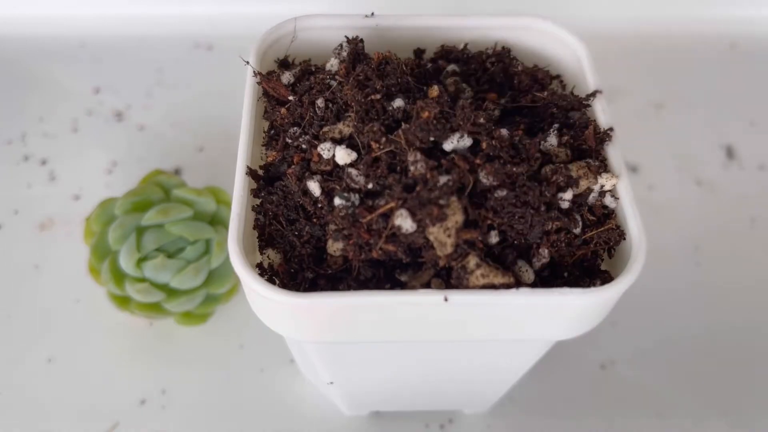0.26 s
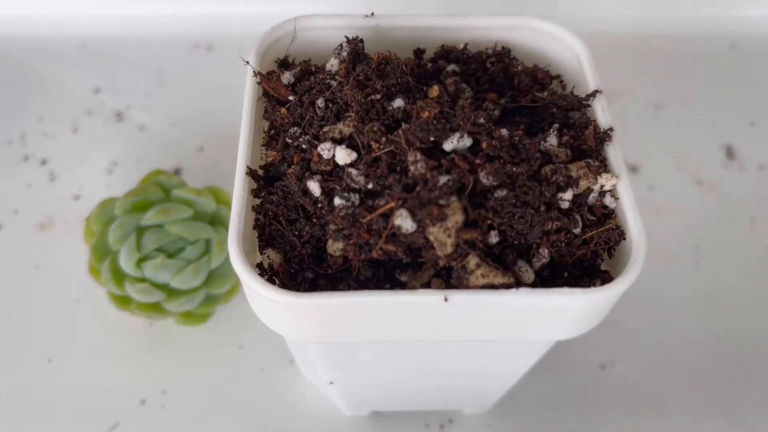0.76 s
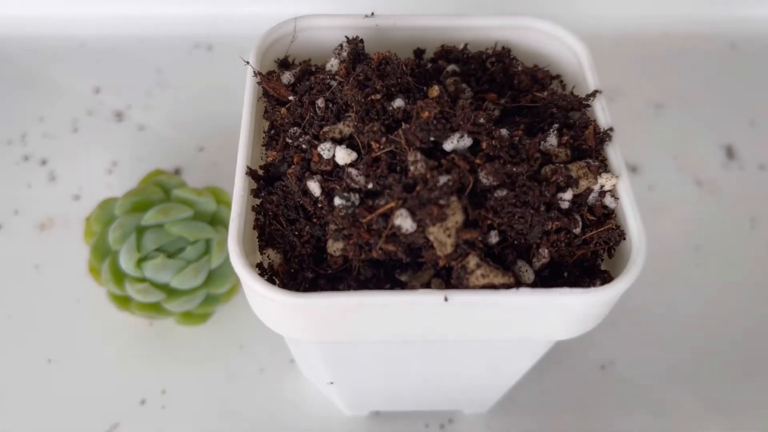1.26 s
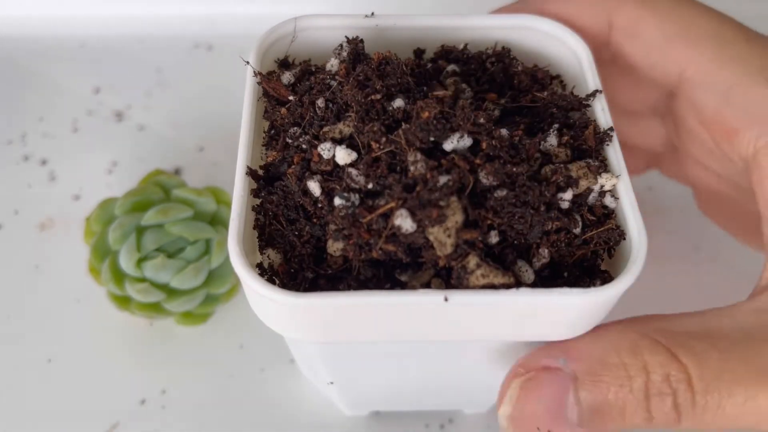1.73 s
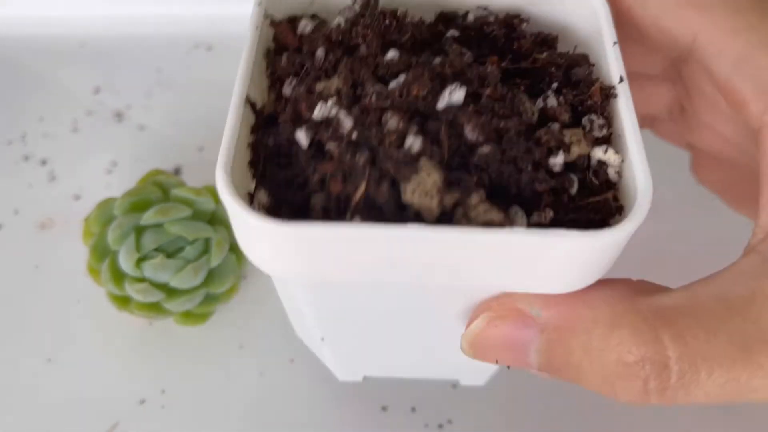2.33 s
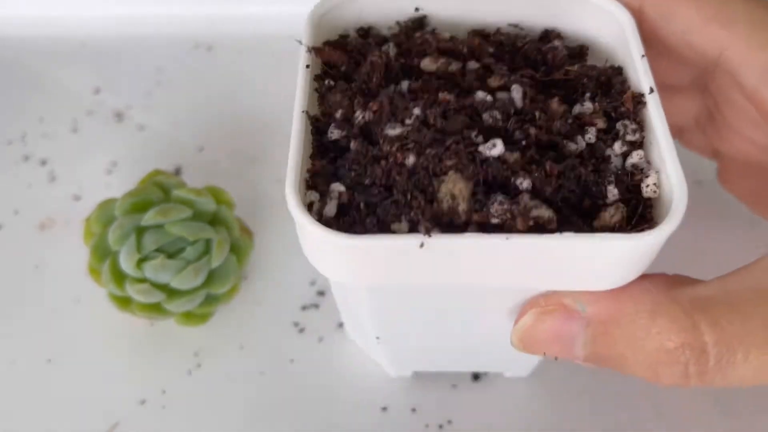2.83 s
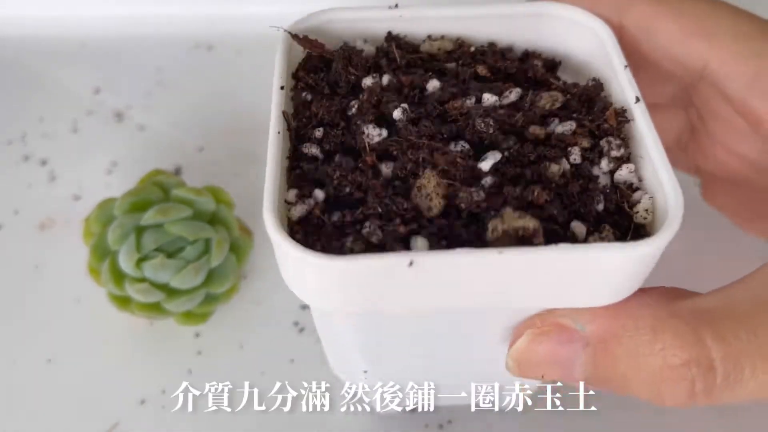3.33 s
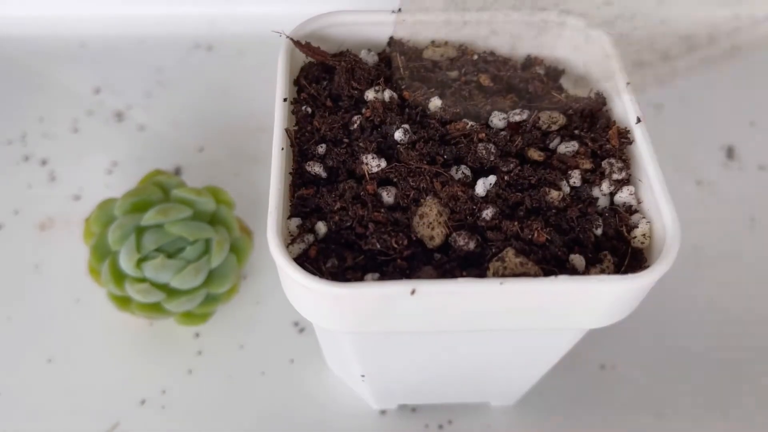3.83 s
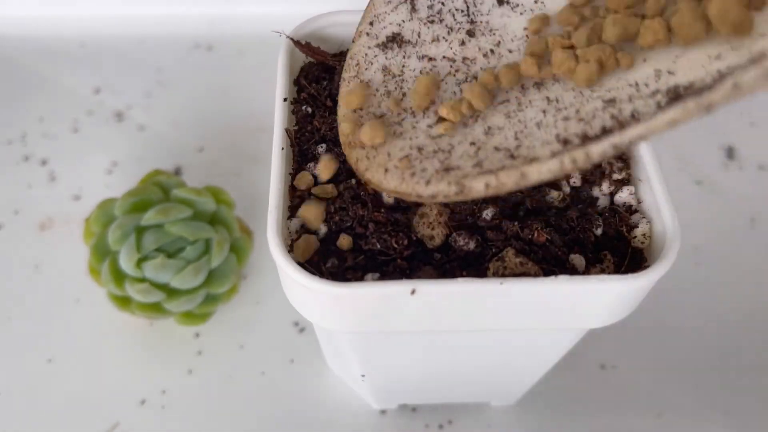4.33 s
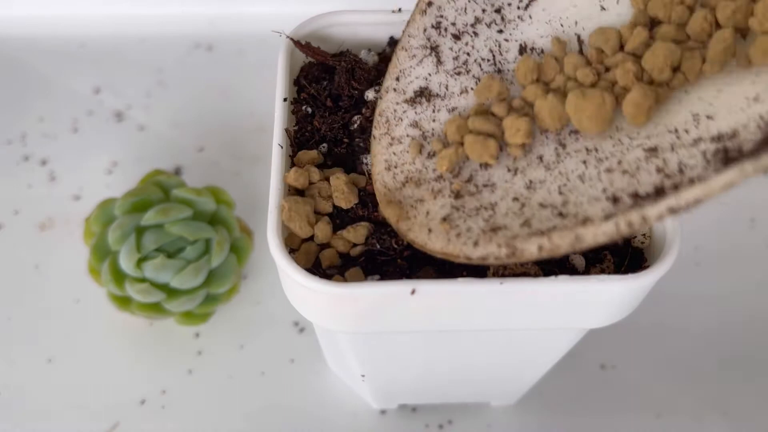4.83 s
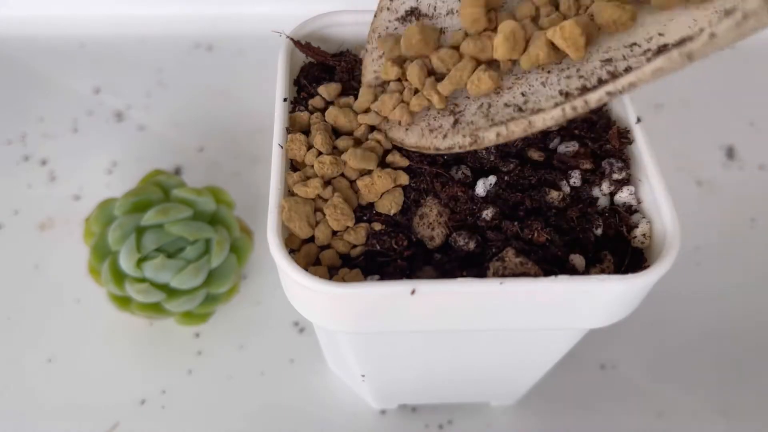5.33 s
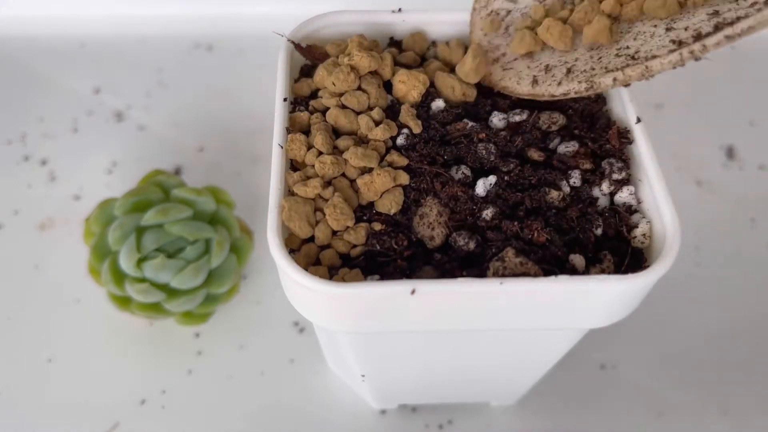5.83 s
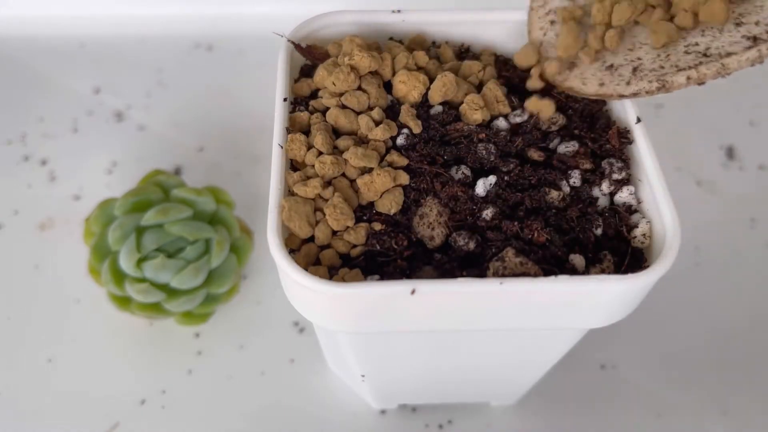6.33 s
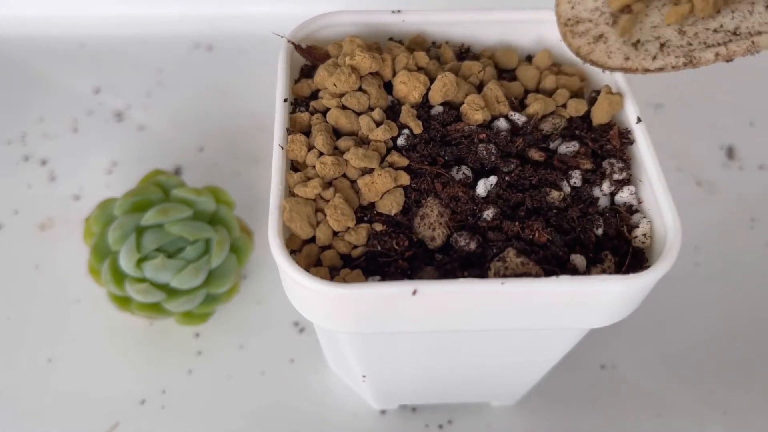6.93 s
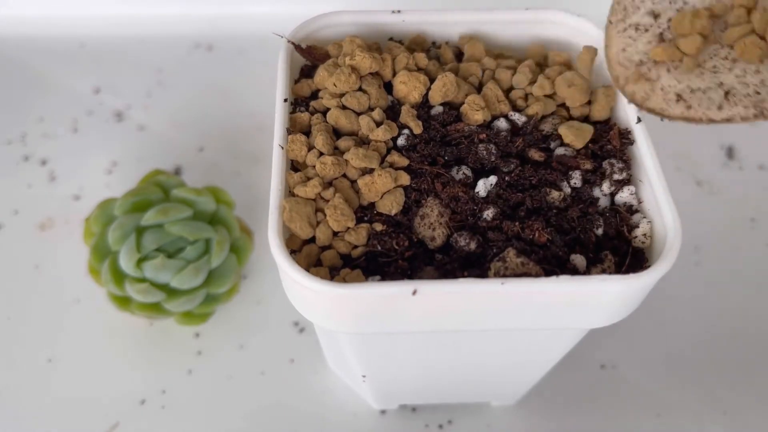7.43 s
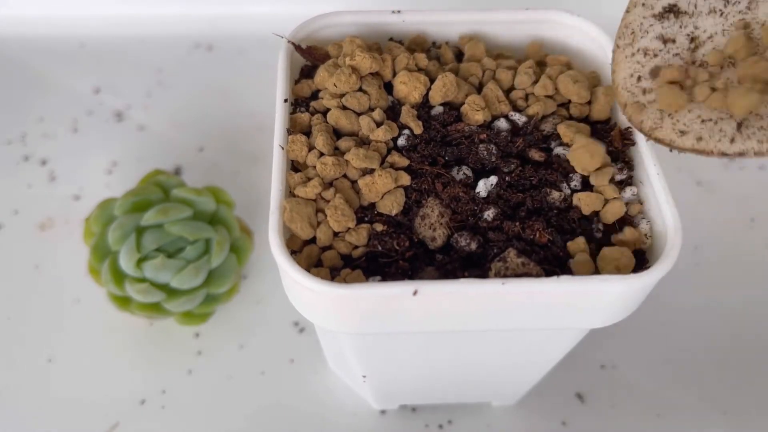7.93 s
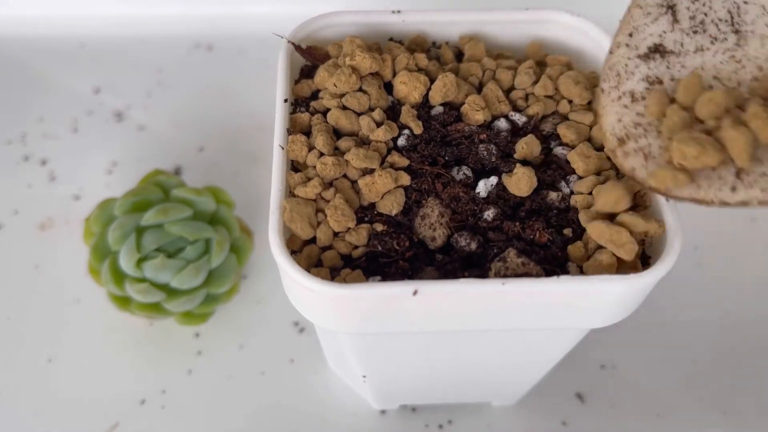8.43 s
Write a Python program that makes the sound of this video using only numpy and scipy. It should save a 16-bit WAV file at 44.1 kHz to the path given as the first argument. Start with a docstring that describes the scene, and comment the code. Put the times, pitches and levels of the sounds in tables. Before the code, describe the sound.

After soft bumps and a faint rub, two hollow knocks of a small plastic pot on a table, then dry clay granules trickle with crisp ticks.

```python
"""Dry granules trickle against plastic, after two hollow knocks of a small soil-filled pot on a table.
Dense grit is a stream of random pings over hissing dust; single ticks are short noise forces that ring plastic modes.
Knocks sum noise cracks and decaying modes of pot and table; bumps and rubs are filtered noise.
Close to a two-port microphone, a small room answers with decaying noise, over a low rumble and a rush of air."""
import sys
import numpy as np
from scipy import signal
from scipy.fft import rfft, irfft, next_fast_len
from scipy.io import wavfile
from scipy.ndimage import map_coordinates

SR = 44100
rng = np.random.default_rng(int(sys.argv[2]) if len(sys.argv) > 2 else 0)


def digitize_waveform(pressure):
    """Quantize a signal to 16-bit integers and store it at the path in sys.argv[1].

    Rows of a 2-D input are taken as channels; values are limited to [-1, 1].
    """
    field = np.atleast_2d(pressure).T
    bounded = np.clip(field, -1, 1)
    quanta = np.round(bounded * 32767).astype(np.int16)
    wavfile.write(sys.argv[1], SR, quanta)


N = 382788

TIME = np.arange(N) / SR  # s, the whole scene
HIT = np.arange(8192) / SR  # s, one contact

# resonances of the ringing plastic: pitch_hz, level_db, t60_s
PLASTIC_MODES = [(910, -2.5, 0.017), (1480, 13.5, .017), (1437, 4, 0.0092), (1750, -0.5, 0.013),
                 (2770, -1.5, 0.019), (4540, -16, 0.021)]


def grit(grit_db=4, sparse_rate=110, dense_rate=300, wall_db=-8):
    """Granular flow: crumbs collide more often the harder they flow, over sliding dust; some ring the plastic."""
    # spectrum of the crunch: frequency_hz, density_db
    grit_spectrum = [(400, -14), (700, -12), (950, 0), (1200, -14), (1520, -1.5), (1850, 1.5), (2300, -5.5),
                     (2750, 0.5), (3600, -1), (4100, -7), (4600, 1.5), (4950, -11.5), (5700, 2.5),
                     (7200, -2), (10000, -6.5), (14500, -12)]
    # gain of the crunch's treble above 7 kHz: time_s, level_db
    treble_curve = [(2.6, 4), (4.1, 4.5), (4.6, -1.5), (5.0, -0.5), (5.35, -9.5), (6.2, -0.5), (7.9, 1.5),
                    (8.6, -1)]
    dust_db, dust_swing_db = -5.5, 3.5  # dust against the colliding crumbs; how much its hiss swells

    flow_db = flow()
    rate = np.interp(flow_db, [-80, -54], np.clip([sparse_rate, dense_rate], 30, 900))
    # a gentle flow only slides; crumbs tumble once it grows stronger
    moving = np.clip((flow_db + 82) / 15, 0, 1)
    grains = crumbs(rate, size_db=6, life=.00011, low_hz=700, high_hz=15700, order=14)
    dust = amp(dust_db + dust_swing_db * wobble(38)) * rng.standard_normal((2, N))
    crunch = unit(coloured(moving * grains + pair(dust, apart=.35), grit_spectrum))

    treble_filter = signal.butter(1, 7000, "high", fs=SR, output="sos")
    treble = signal.sosfilt(treble_filter, crunch)
    treble_gain = amp(np.interp(TIME, *np.transpose(treble_curve)))
    crunch = crunch + (treble_gain - 1) * treble

    # some crumbs hit a wall, each at a spot with its own pitch
    wall = np.zeros((2, N))
    for when, spot, force in rng.random((260, 3)):
        wall_ring = packed(ring(1 + 0.37 * spot, PLASTIC_MODES), 0.024)
        add(wall, when * N / SR, force ** 2 * wall_ring)
    return amp(flow_db + grit_db) * (crunch + amp(wall_db) * moving * wall)


def flow():
    """Avalanche envelope in dB: each slide breaks loose, builds, holds and runs out, and a few crumbs linger."""
    # soil shifts in the pot or granules slide off the scoop: start_s, build_s, hold_s, run_out_s, level_db
    slides = [(2.158, .02, .25, .25, -78), (2.521, .15, .16, .1, -70), (3.118, .08, .08, .2, -72),
              (3.6, .2, .04, .1, -65), (3.852, .01, .07, .08, -57), (3.997, .12, .28, .12, -62),
              (4.45, .53, .48, .1, -55), (5.499, .04, .13, .15, -63), (6.062, .04, .23, 0.11, -63.5),
              (6.365, .05, .12, .18, -65), (6.72, .06, .14, .2, -70), (6.996, .06, .15, .08, -66),
              (7.473, 0.022, .08, .15, -76), (7.632, .18, .37, .06, -60), (8.335, 0.027, .02, .07, -64),
              (8.434, .06, .06, .2, -67)]
    start_db_per_s = 597.5  # how fast the first crumbs break loose
    swell_db = 13  # growth over the build-up, and loss in each run-out time
    linger_db, linger_db_per_s = -13, 9  # the last crumbs keep creeping

    t = TIME[::64]
    s, build, hold, run_out, db = np.transpose(slides)[:, :, None]
    breaking_loose = start_db_per_s * np.minimum(t - s, 0)
    rising = swell_db * np.clip((t - s) / build - 1, -1, 0) + breaking_loose
    after = np.maximum(t - s - build - hold, 0)
    falling = np.maximum(-swell_db * after / run_out, linger_db - linger_db_per_s * after)
    strongest_db = (db + rising + falling).max(axis=0)
    return np.interp(TIME, t, strongest_db)


def crumbs(rate, size_db, life, low_hz, high_hz, order):
    """Shot noise of steady mean power: each collision is a quick cluster of tiny pings at unrelated pitches."""
    starts = np.flatnonzero(np.diff(np.floor(np.cumsum(rate) / SR)))
    chance = rng.random((len(starts), 4, order, 1))
    spread = np.clip(rng.standard_normal(len(starts)), -2, 2)
    # denser collisions are smaller, so that the power stays even
    sizes = amp(size_db * spread) / np.sqrt(rate[starts])
    starts = starts + (chance[:, 0, 0, 0] - .5) * 2 * SR / rate[starts]

    t = HIT[:int(8 * life * SR)]
    hz = low_hz + (high_hz - low_hz) * chance[:, 1]
    age = t / (life * (.5 + chance[:, 2]))
    pings = sizes[:, None, None] * age * np.exp(-age) * np.sin(2 * np.pi * hz * t)

    # pings of one cluster are scattered over 1.2 ms
    where = starts[:, None, None] + (.0012 * chance[:, 3] + t) * SR
    index = np.clip(np.round(where).astype(int), 0, N)
    return unit(np.bincount(index.ravel(), pings.ravel(), N + 1)[:N])


def ticks(click_db=1.0, hollow_db=-1, graze_db=-20, bounce_db=-16, scuff_t60=.012, size=2048):
    """Impact excitation: a granule grazes, strikes and bounces; the plastic's modes ring, tuned by the spot."""
    # loudest single granules on scoop or pot: time_s, click_level_db, click_pitch_hz, hollow_ring_level_db
    tick_rows = [(.405, -52.5, 7200, -68), (1.778, -53, 3520, -52), (2.571, -51.5, 8180, -77.5),
                 (2.612, -54.5, 4000, -53), (2.665, -54.5, 7500, -63), (2.74, -55, 3010, -50),
                 (2.781, -74, 2660, -47), (2.795, -44.5, 6800, -48), (3.178, -49.5, 6900, -57),
                 (3.227, -43, 3560, -59), (3.236, -33, 3760, -52), (3.296, -55.5, 3510, -44.5),
                 (3.386, -68, 2540, -49.5), (3.499, -57, 2920, -42.5), (4.031, -42, 7630, -65),
                 (4.17, -38, 5840, -57), (4.184, -53, 7400, -64), (4.211, -36, 6550, -65),
                 (4.263, -36.5, 6040, -54), (4.334, -51.5, 5530, -62), (4.358, -38.5, 4190, -35.5),
                 (4.382, -42.5, 6150, -68), (4.394, -43, 5420, -56), (4.448, -49.5, 6540, -60),
                 (4.566, -33, 3040, -53), (4.599, -43.5, 5440, -38.5), (4.633, -50.5, 3000, -50.5),
                 (4.786, -45.5, 7100, -61), (4.841, -43, 7580, -71), (4.953, -54, 5850, -50),
                 (4.972, -49, 7340, -65), (5.016, -41, 6600, -69), (5.047, -46, 2800, -44),
                 (5.103, -46.5, 5560, -58), (5.161, -40, 6700, -67), (5.199, -47.5, 5640, -69),
                 (5.249, -44, 6500, -71), (5.264, -39.5, 6540, -61), (5.294, -44.5, 6000, -62),
                 (5.307, -40.5, 5700, -66), (5.334, -38, 6060, -72), (5.409, -45.5, 6500, -65),
                 (5.423, -48, 3180, -48.5), (5.445, -47, 3450, -45), (5.467, -50, 3300, -53),
                 (5.478, -35.5, 5900, -48), (5.484, -49.5, 4510, -48), (5.598, -47.5, 6200, -52),
                 (5.651, -44, 6500, -66), (5.683, -34.5, 7430, -68), (5.697, -44, 7400, -75),
                 (5.907, -54, 7100, -83), (6.281, -46.5, 5670, -68), (6.29, -42, 6360, -59),
                 (6.304, -41.5, 6040, -69), (6.357, -47, 7400, -68), (6.462, -40, 6980, -55),
                 (6.604, -49, 7120, -56.5), (6.682, -51.5, 2720, -46.5), (7.033, -47.5, 4550, -42.5),
                 (7.084, -53, 7500, -74), (7.332, -38, 6530, -69), (7.336, -46.5, 2850, -40.5),
                 (7.472, -46.5, 7560, -59), (7.766, -57, 3280, -46.5), (7.85, -47.5, 3400, -51),
                 (7.88, -48, 7550, -59), (7.946, -48, 7000, -90), (8.068, -44, 5380, -52.5),
                 (8.187, -42.5, 5450, -55), (8.493, -40, 6430, -66), (8.516, -49.5, 6540, -68),
                 (8.674, -50, 2870, -46)]
    # spectrum of a click around its own pitch: pitch_multiple, level_db
    click_spectrum = [(0.078, -26), (.3, -11), (.7, -7), (0.999, 2), (1.498, -5.5), (4.502, -19.5)]
    click_t60 = .0055  # s

    out, t = np.zeros((2, N)), HIT[:size]
    for s, db, hz, ring_db in tick_rows + strays():
        lead, hop, spot = rng.uniform([.002, .004, .97], [.005, .014, 1.05])
        # graze, strike and bounce follow one another
        age = np.maximum(t - np.array([[0], [lead], [lead + hop]]), 0)
        contact_db = np.array([[graze_db], [0], [bounce_db]])
        contacts = amp(contact_db - 60 * age / click_t60) * (1 - np.exp(-age / .0006)) ** 2
        force = contacts.sum(axis=0) * pair(rng.standard_normal((2, size)), apart=.2)
        click = packed(coloured(force, click_spectrum, hz), 0.0031)
        add(out, s - lead - .001, amp(db + click_db) * click)

        scuff = burst(scuff_t60, apart=0)[0, :size // 8]
        hollow = signal.fftconvolve(ring(spot, PLASTIC_MODES, attack=0.0016), scuff)
        add(out, s - .001, amp(ring_db + hollow_db) * packed(hollow, 0.0061))
    return out


def strays(count=130):
    """Random scattering: granules bounce off more often and harder in a stronger flow; rows as in ticks."""
    stray_db, stray_hz, stray_ring_db = 1, 6500, -10  # level over the flow, middle pitch, ring against click
    scatter_db, crowding = 4, .7  # spread of their sizes; their rate grows as this power of the flow
    follow, strong_flow_db = 0.43, -56  # their level follows only this share of the drop from a strong flow

    flow_db = flow()
    share = np.cumsum(amp(crowding * flow_db))
    at = np.searchsorted(share / share[-1], (np.arange(count) + rng.random(count)) / count)
    force, pitch, spot = np.clip(rng.standard_normal((count, 3)), -2, 2).T
    followed_db = strong_flow_db + follow * (flow_db[at] - strong_flow_db)
    db = followed_db + stray_db + scatter_db * force
    return list(zip(at / SR, db, stray_hz * np.exp(.22 * pitch), db + stray_ring_db + 6 * spot))


def knocks(ring_db=0, crack_db=-3, crack_t60=0.015, table_t60=0.11, boom_db=1, board_db=0,
           soil_db=-13, soil_t60=0.12, soil_delay=0.015):
    """Coupled impact: pot edges land in turn with a hollow clack, the table top booms and the soil drops back."""
    # the pot's base knocked on the table: time_s, level_db, pitch_factor, treble_tilt_db_per_octave, table_level_db
    knock_rows = [(1.9565, -17.5, 1.034, 2.5, -26), (2.1432, -17, .97, 0, -24.5)]
    # spectrum of the clack: frequency_hz, density_db
    clack_spectrum = [(40, -6.5), (550, -7), (800, -13.5), (1400, -3.5), (2300, -14), (3200, -16),
                      (4600, -22.5), (7000, -32), (14500, -42)]
    # spectrum of the table's boom: frequency_hz, density_db
    boom_spectrum = [(28, -27), (90, 7.5), (170, 1), (350, -4.5), (580, -5.5), (800, -13), (2000, -44)]
    # modes of the pot's base struck flat: pitch_hz, level_db, t60_s
    base_modes = [(1200, -3, 0.0085), (1380, 0, 0.015), (1510, -4, .008), (1980, -13.5, .014),
                  (2420, -9.5, .016), (3350, -12.5, .012), (4570, -17, .008)]
    # modes of the table top with the pot on it: pitch_hz, level_db, t60_s
    board_modes = [(105, -0.5, 0.081), (210.6, -4.5, 0.15), (341, -14, 0.2), (512, -8.5, 0.03),
                   (630, -0.5, 0.072), (720, -9.5, 0.15), (978, -11.5, 0.014)]
    rock_s, rock_db = .0035, -7.5  # the far edge of the base lands a moment later
    rebound_s, rebound_db = .016, -17.5  # then the pot rebounds and lands once more
    knock_lag_s = .00013  # extra travel to the far port; short, as the pot stands more to the front

    out, leftward = np.zeros((2, N)), amp([[1.7], [-1.7]])
    for s, db, pitch, treble_db, table_db in knock_rows:
        for lag, edge_db in [(0, 0), (rock_s, rock_db), (rebound_s, rebound_db)]:
            clack = coloured(burst(crack_t60, apart=0.19), clack_spectrum, pitch)
            # the tilt acts over two octaves above 2 kHz
            clack = filtered(clack, lambda hz: amp(treble_db * np.clip(np.log2((hz + 1) / 2000), 0, 2)))
            add(out, s + lag, amp(db + edge_db + crack_db) * packed(clack, 0.0054) * leftward)
            base = packed(ring(pitch, base_modes, attack=0.00045), 0.0075) * leftward
            add(out, s + lag, amp(db + edge_db + ring_db) * from_side(base, knock_lag_s))
        boom = packed(coloured(burst(table_t60, apart=0.37), boom_spectrum), 0.0096)
        add(out, s + 0.0021, amp(table_db + boom_db) * boom)
        board = packed(ring(1, board_modes), 0.0032)
        add(out, s + 0.00076, amp(table_db + board_db) * board)
        soil = coloured(touch(soil_t60, rise=0.0009, apart=1.0), clack_spectrum, pitch=1.6)
        add(out, s + soil_delay, amp(db + soil_db) * packed(soil, 0.00057))
    return out


def bumps(cycles=7, shortest=0.023, bump_db=0, crunch_db=-11, crunch_t60=0.073):
    """Damped soft contacts, a light touch and then the full weight: the lower the thud, the longer it lasts."""
    # scoop, hand and pot, carried by the table: first_touch_s, level_db, pitch_hz, delay_to_full_weight_s
    bump_rows = [(0.936, -33.5, 384, 0.0026), (1.15, -37.5, 354, 0.0027), (1.195, -43.5, 248, 0.0013),
                 (3.325, -47, 199, 0.0017), (3.383, -50, 235, .002), (3.469, -52, 794, 0.0044),
                 (3.498, -44.5, 734, 0.003), (3.853, -24.5, 170, 0.0077), (3.898, -24, 118, .016),
                 (6.455, -47, 810, 0.0024), (7.035, -43.5, 1020, 0.00082), (7.206, -54, 262, 0.0022),
                 (7.768, -51.5, 272, 0.001)]
    # spectrum of a thud around its own pitch: pitch_multiple, level_db
    thud_spectrum = [(.15, -48), (.45, -6), (1, 1), (1.8, -10.5), (3.5, -26), (10, -41.5), (30, -59)]
    # spectrum of granules crushed under a bump: frequency_hz, density_db
    crunch_spectrum = [(150, 13), (450, 2), (720, 5), (1600, -11), (2200, -18), (3300, -16), (10000, -30.5)]
    touch_db, touch_pitch = -6.5, 2  # the first touch is weaker and higher than the thump

    out = np.zeros((2, N))
    touches = [(s, db + touch_db, hz * touch_pitch) for s, db, hz, lag in bump_rows]
    thumps = [(s + lag, db, hz) for s, db, hz, lag in bump_rows]
    for s, db, hz in touches + thumps + judder():
        thud = coloured(burst(shortest + cycles / hz, apart=0.54), thud_spectrum, hz)
        add(out, s, amp(db + bump_db) * packed(thud, 0.012))
    # granules crunch under the weight
    for s, db, hz, lag in bump_rows:
        crunch = coloured(touch(crunch_t60, rise=0.00088, apart=0.38), crunch_spectrum)
        add(out, s, amp(db + crunch_db) * packed(crunch, 0.013))
    return from_side(out) * amp([[-2.5], [2]])


def judder(count=6):
    """Stick-slip: the dragged scoop slips in a short even run; rows of start_s, level_db, pitch_hz."""
    start_s, gap_s, level_db, middle_hz = 1.009, 0.016, -45.5, 400
    return [(start_s + k * gap_s, level_db, middle_hz * np.exp(0.36 * rng.standard_normal()))
            for k in range(count)]


def rub():
    """Sliding friction as shaped noise: each stroke swells and fades as an even, soft brush."""
    # scoop drawn through soil, pot sliding on the table: peak_s, rise_s, fall_s, level_db, pitch_factor
    strokes = [(1.19, 0.36, 0.33, -61.5, 1.72), (3.535, 0.083, 0.18, -54, 0.92)]
    # spectrum of the brush: frequency_hz, density_db
    rub_spectrum = [(300, 11.5), (900, 12), (3400, 6), (5200, 1.5), (15000, -23.5)]

    out = np.zeros((2, N))
    for s, rise, fall, db, pitch in strokes:
        stroke = np.interp(TIME, [s - rise, s, s + fall], [0, 1, 0])
        scrape = unit(coloured(pair(rng.standard_normal((2, N)), apart=0.69), rub_spectrum, pitch))
        out += amp(db + 1.7 * wobble(77)) * stroke * scrape
    return out


def room(x, early_db=-13, early_t60=0.13, tail_db=-21):
    """Reverberation: near surfaces answer at once; the tail decays at its own speed for each frequency."""
    # how long the room rings: frequency_hz, t60_s
    room_decay = [(100, .38), (400, .3), (900, .28), (1370, .43), (1800, .33), (3200, .42), (5000, .38),
                  (12000, .19)]
    # spectrum of the near reflections: frequency_hz, level_db
    wall_spectrum = [(100, 9.5), (4000, 8.5), (8000, -6.5), (14000, 5.5)]

    hz, t, z = signal.stft(rng.standard_normal((2, SR // 2)), SR, nperseg=256)
    decay = amp(-60 * t / along(room_decay, hz)[:, None])
    tail = signal.istft(z * decay, SR, nperseg=256)[1]
    response = amp(tail_db) * tail / np.linalg.norm(tail[0])
    early = coloured(burst(early_t60, apart=1.0), wall_spectrum)
    add(response, .004, amp(early_db) * early / np.linalg.norm(early[0]))
    return signal.fftconvolve(x, response, axes=1)[:, :N]


def rumble(air_db=-64.0):
    """Stationary filtered noise: a drifting low rumble and a steady rush of air."""
    # spectrum of the rumble: frequency_hz, density_db
    rumble_spectrum = [(22, -29), (36, -4), (52, 4.5), (100, 0), (160, -8), (240, -8), (450, -27.5),
                       (1000, -74), (4000, -100)]
    # spectrum of the air: frequency_hz, density_db
    air_spectrum = [(150, -20), (450, -5), (950, 0), (1550, -4), (2150, -21), (2700, -27), (4600, -28),
                    (6800, -36), (8500, -33), (14500, -48)]
    # slow drift of the rumble: time_s, level_db
    drift = [(0, -52), (1.3, -52.5), (3.4, -51), (4.4, -56.5), (5.8, -57.5), (6.7, -54.5), (7.6, -55),
             (8.6, -53)]

    drone_db = np.interp(TIME, *np.transpose(drift)) + 1.3 * wobble(1.846)
    drone = from_side(ambience(rumble_spectrum)) * amp([[-1.8], [1.4]])
    return amp(drone_db) * drone + amp(air_db) * ambience(air_spectrum)


def ambience(spectrum):
    """Diffuse-field noise of rms 1: the two ports agree in the bass and differ higher up."""
    # left-right correlation of room noise: frequency_hz, likeness
    likeness = [(60, 1), (130, 0.85), (290, 0.94), (640, 0.012), (3000, 0.053)]

    def response(hz):
        turn = np.arccos(np.clip(along(likeness, hz), -1, 1)) / 2
        return amp(along(spectrum, hz)) * [np.cos(turn), np.sin(turn)]

    return unit(pair(filtered(rng.standard_normal((2, N)), response), 1))


def ring(pitch, modes, attack=0.00086):
    """Modal synthesis: a struck body's decaying sines, at new strengths for every blow."""
    hz, db, t60 = np.transpose(modes)[:, :, None]
    t = HIT[:int(t60.max() * SR)]
    level, detune, phase = rng.standard_normal((3, len(modes), 1))
    mode_hz = hz * pitch * (1 + 0.0036 * detune)
    lines = amp(db + 2 * level - 60 * t / t60) * np.sin(2 * np.pi * mode_hz * t + phase)
    return lines.sum(axis=0) * (1 - np.exp(-t / attack))


def burst(t60, apart):
    """Exponential decay: the rough force of one contact is noise that dies away."""
    return pair(rng.standard_normal((2, len(HIT))), apart) * amp(-60 * HIT / t60)


def touch(t60, rise, apart):
    """Crushing contact: the force builds as the grain gives way, then dies away."""
    return burst(t60, apart) * (1 - np.exp(-HIT / rise)) ** 2


def ports(x):
    """Interaural-style phase: sound from the right reaches the left port late, mostly in the treble."""
    # phase of the left port against the right: frequency_hz, phase_rad
    port_phase = [(2200, 0), (3300, 1), (4000, 0), (5200, .6), (5650, -2.3), (8400, -5.9), (9600, -6.5),
                  (13500, -9.8), (15800, -12.4)]
    return filtered(x, lambda hz: np.exp(.5j * along(port_phase, hz) * np.array([[1], [-1]])))


def from_side(x, lag=.00043):
    """Path difference: the right port hears it lag seconds later than the left."""
    return filtered(x, lambda hz: np.exp(np.pi * 1j * hz * lag * np.array([[1], [-1]])))


def pair(noises, apart):
    """Mid-side mixing: two unrelated signals become left and right with a common part."""
    return np.array([noises[0] + apart * noises[1], noises[0] - apart * noises[1]])


def coloured(x, points, pitch=1):
    """Minimum-phase filtering: x through a causal filter with the given spectrum."""
    size = min(x.shape[-1], 4096)
    gain = amp(along(points, np.fft.rfftfreq(size, 1 / SR) / pitch))
    # folding the cepstrum forward makes the filter causal
    cepstrum = irfft(np.log(gain))
    cepstrum[1:size // 2] *= 2
    cepstrum[size // 2 + 1:] = 0
    kernel = irfft(np.exp(rfft(cepstrum)))
    return signal.oaconvolve(x, kernel[None], axes=1)[:, :x.shape[-1]]


def filtered(x, response):
    """Linear filtering: the spectrum of x times a complex response of frequency."""
    size = next_fast_len(x.shape[-1] + 4096)
    spectrum = rfft(x, size) * response(np.fft.rfftfreq(size, 1 / SR))
    return irfft(spectrum, size)[..., :x.shape[-1]]


def wobble(rate):
    """Band-limited randomness: a smooth random curve with rate knots a second."""
    coarse = TIME[::64]
    knots = rng.standard_normal(int(N * rate / SR) + 4)
    return np.interp(TIME, coarse, map_coordinates(knots, [coarse * rate]))


def along(points, hz):
    """Logarithmic frequency scale: (Hz, value) points read on a log axis."""
    f, v = np.transpose(points)
    return np.interp(np.log(hz + 1e-6), np.log(f), v)


def amp(db):
    """Level scale: decibels to amplitude gain."""
    return np.exp(np.asarray(db) * (np.log(10) / 20))


def unit(x):
    """Power normalisation: scaled to rms 1."""
    return x / np.sqrt(np.mean(x ** 2) + 1e-20)


def packed(x, seconds):
    """Energy normalisation: as much energy as rms 1 held for that long."""
    return unit(x) * np.sqrt(seconds * SR / x.shape[-1])


def add(track, s, sound):
    """Superposition: mix a sound into the track at time s."""
    part = track[:, max(round(s * SR), 0):][:, :sound.shape[-1]]
    part += sound[..., :part.shape[1]]


def scene(close_db=-3):
    """Direct and reverberant sound: close granules stay nearly dry; knocks and bumps reach the room in full."""
    granules = ports(grit() + ticks())
    handling = knocks() + bumps() + rub()
    return granules + handling + room(amp(close_db) * granules + handling) + rumble()


def record(dry):
    """Band limiting: the microphone thins the deepest bass, softens the top and keeps nothing above its limit."""
    low_cut_hz, soft_top_hz, top_hz = 28, 14000, 16100
    low_cut = signal.butter(2, low_cut_hz, "high", fs=SR, output="sos")
    thinned = signal.sosfilt(low_cut, dry)
    return filtered(thinned, lambda hz: (hz < top_hz) / np.hypot(1, (hz / soft_top_hz) ** 2))


dry = scene()
out = record(dry)
digitize_waveform(out)
```